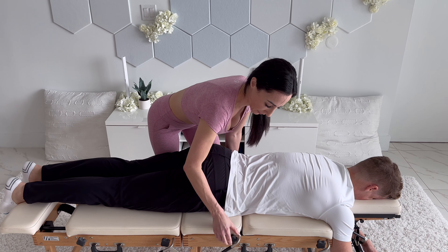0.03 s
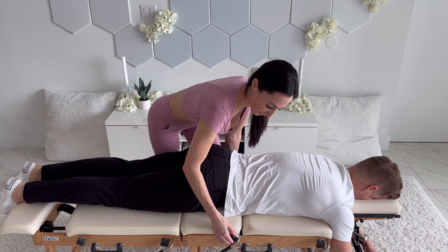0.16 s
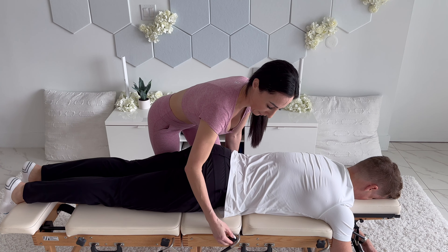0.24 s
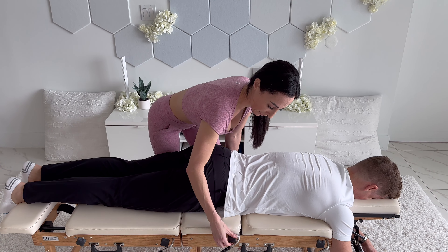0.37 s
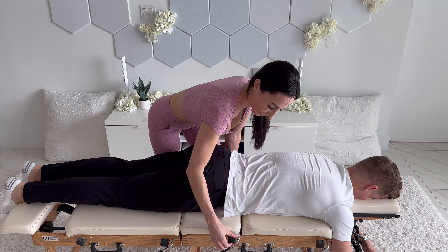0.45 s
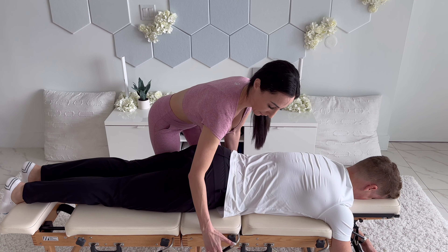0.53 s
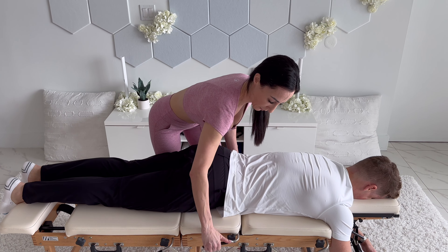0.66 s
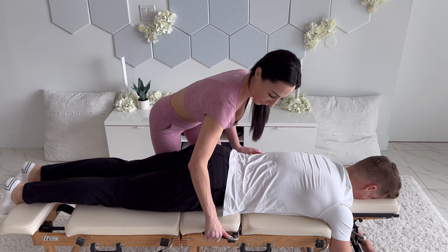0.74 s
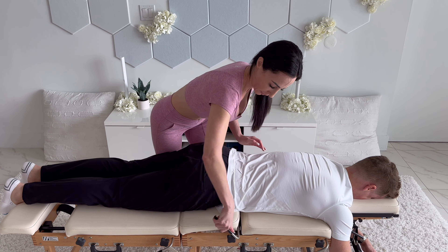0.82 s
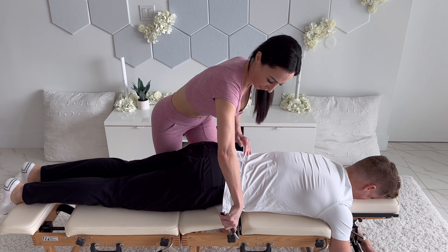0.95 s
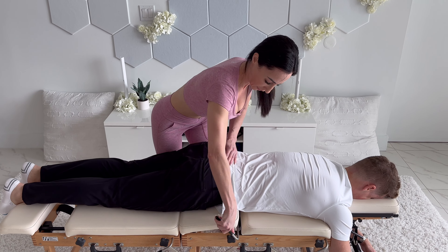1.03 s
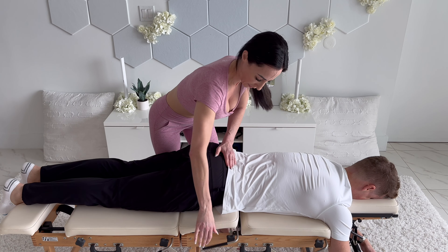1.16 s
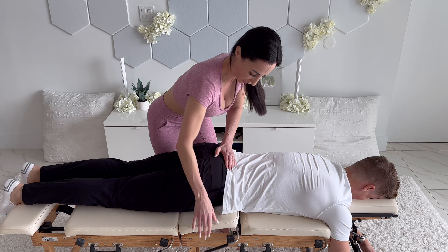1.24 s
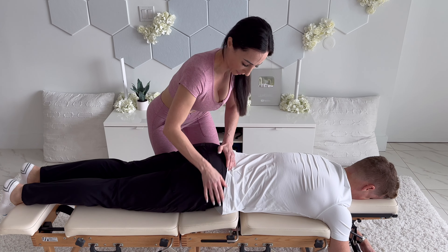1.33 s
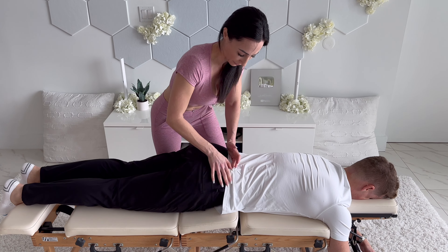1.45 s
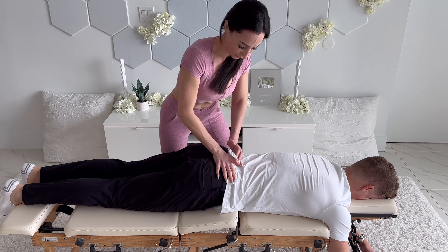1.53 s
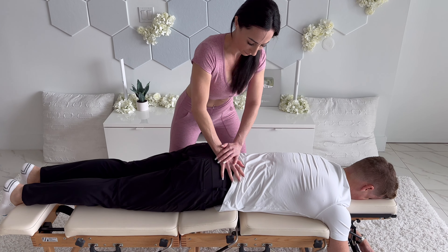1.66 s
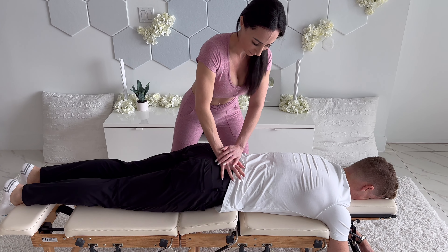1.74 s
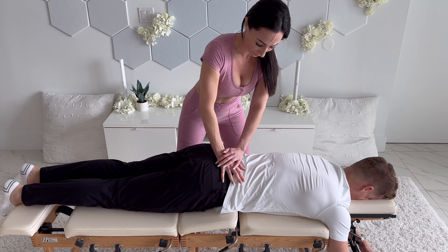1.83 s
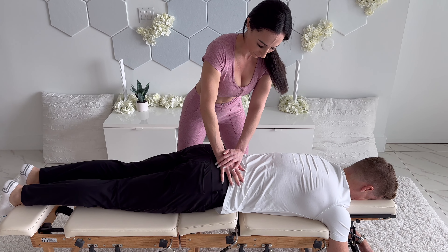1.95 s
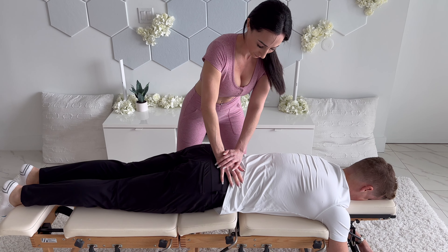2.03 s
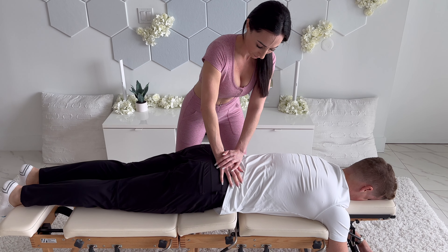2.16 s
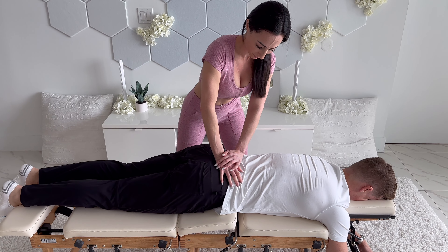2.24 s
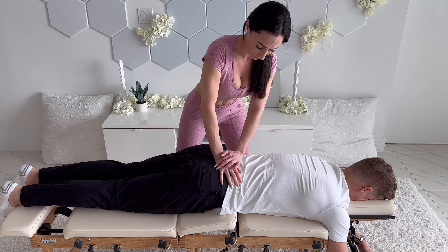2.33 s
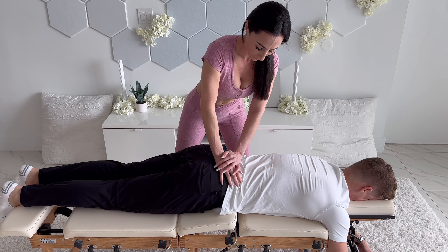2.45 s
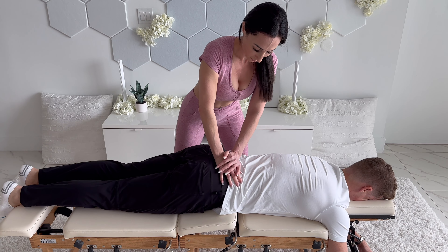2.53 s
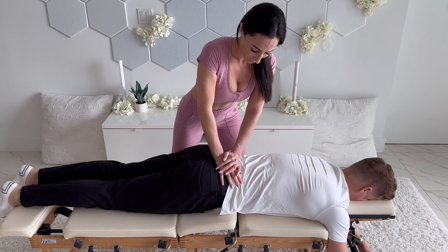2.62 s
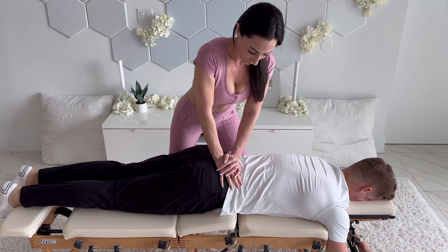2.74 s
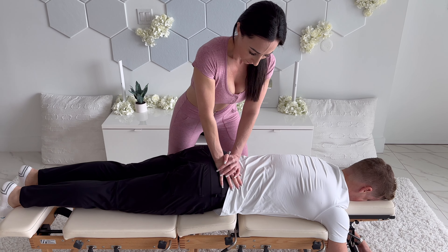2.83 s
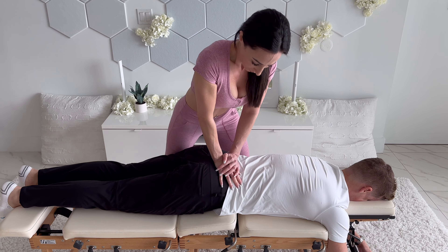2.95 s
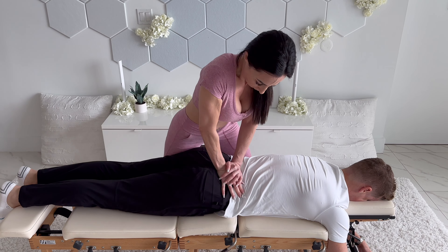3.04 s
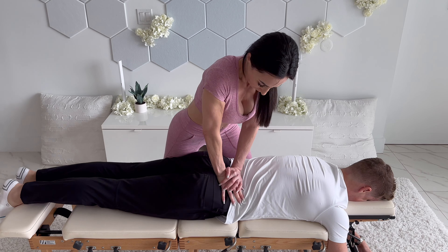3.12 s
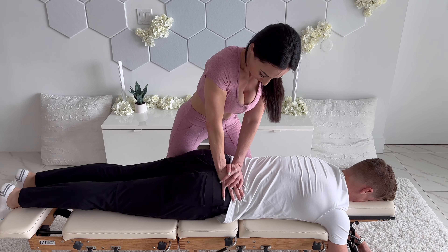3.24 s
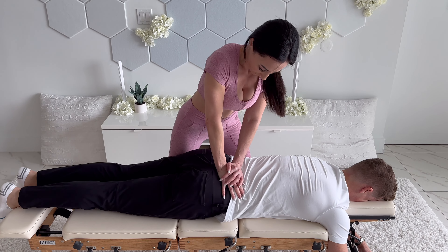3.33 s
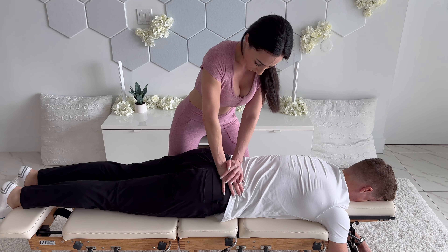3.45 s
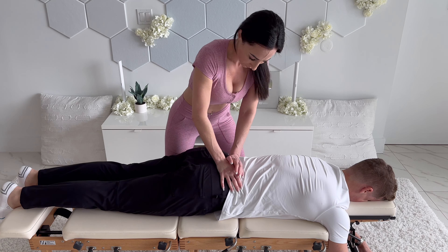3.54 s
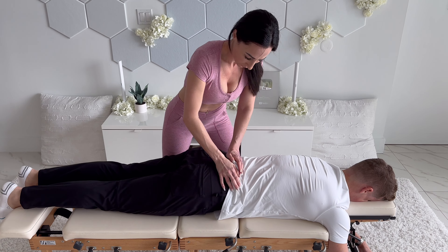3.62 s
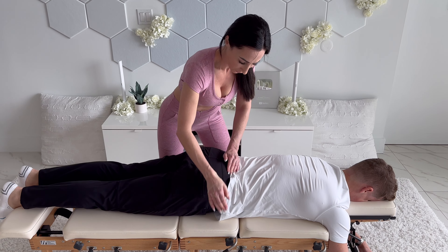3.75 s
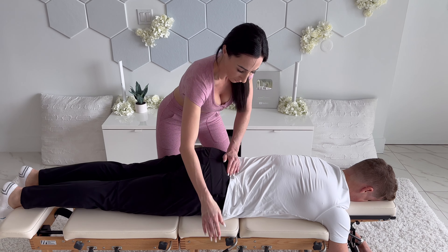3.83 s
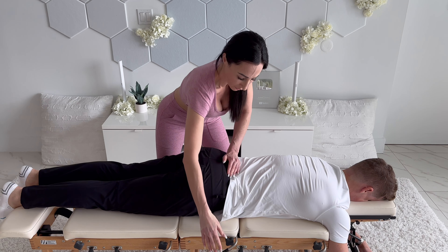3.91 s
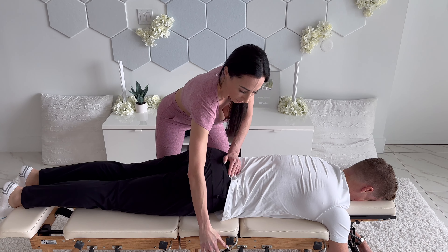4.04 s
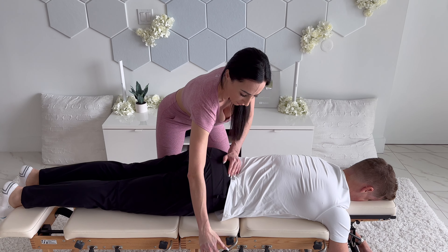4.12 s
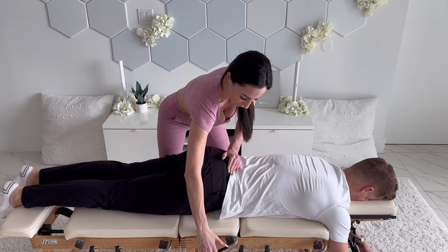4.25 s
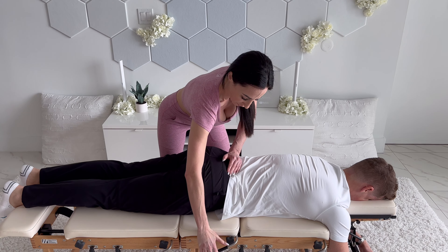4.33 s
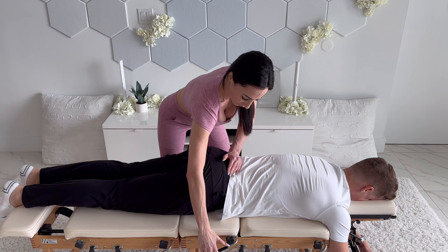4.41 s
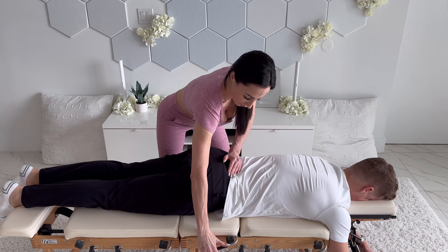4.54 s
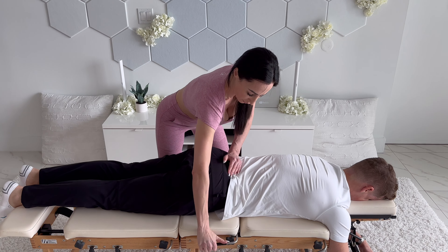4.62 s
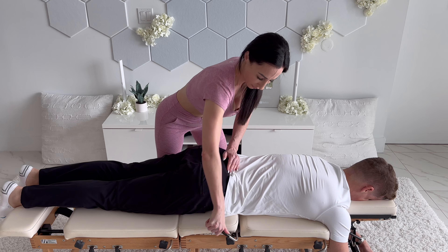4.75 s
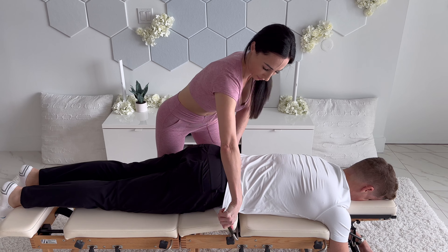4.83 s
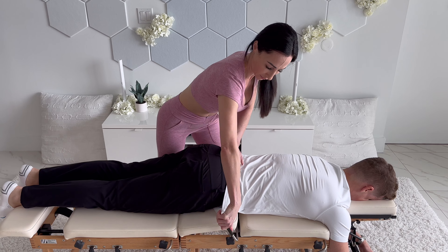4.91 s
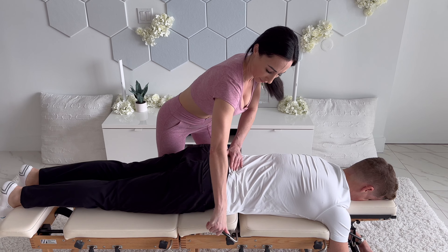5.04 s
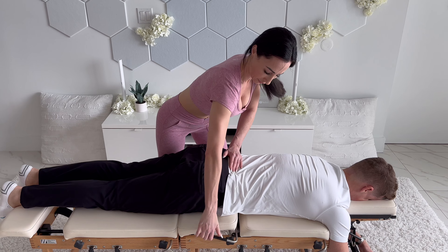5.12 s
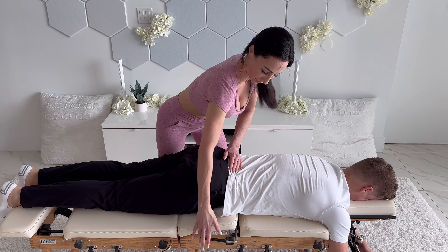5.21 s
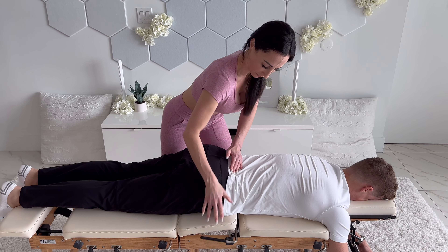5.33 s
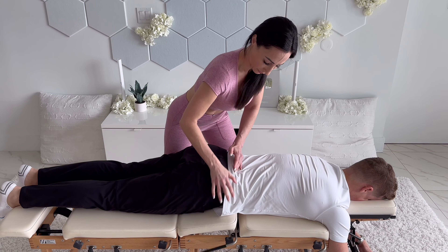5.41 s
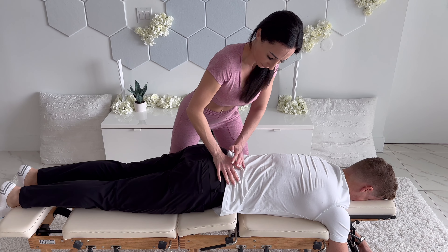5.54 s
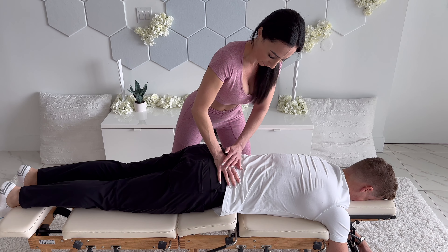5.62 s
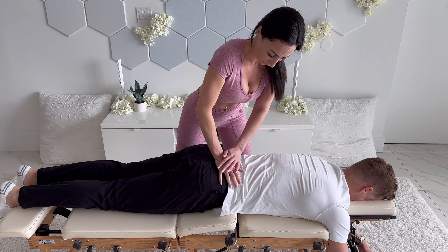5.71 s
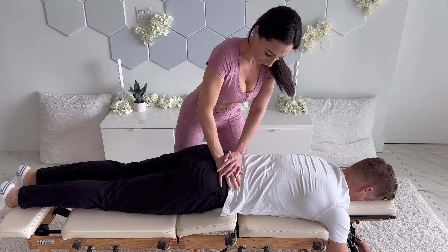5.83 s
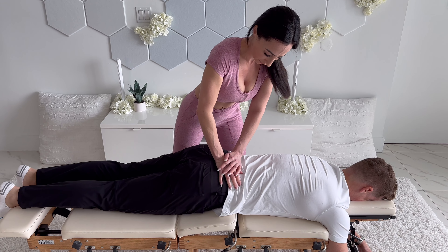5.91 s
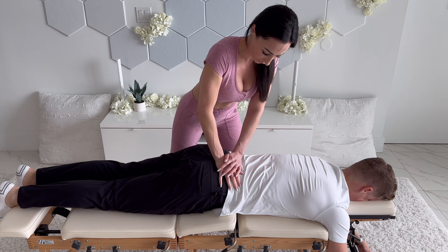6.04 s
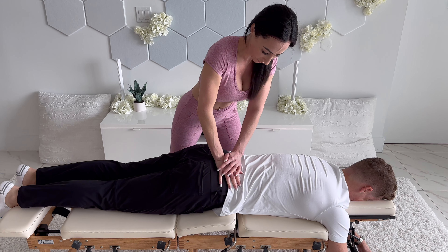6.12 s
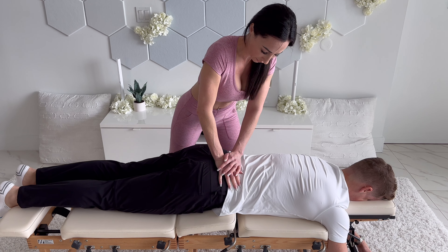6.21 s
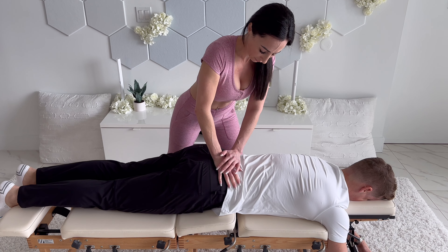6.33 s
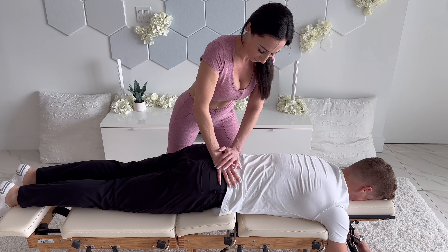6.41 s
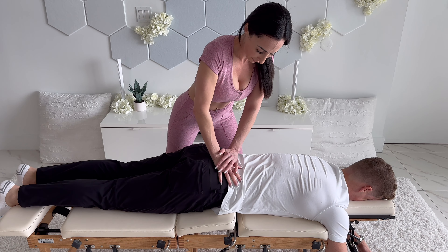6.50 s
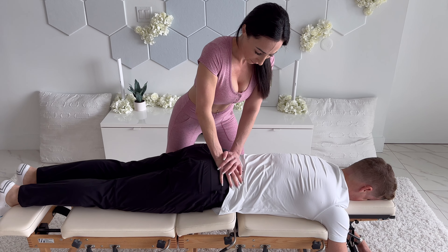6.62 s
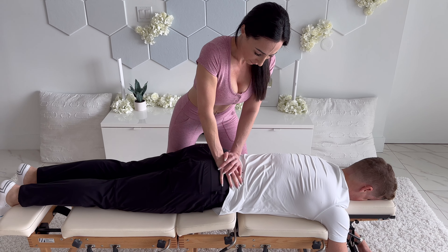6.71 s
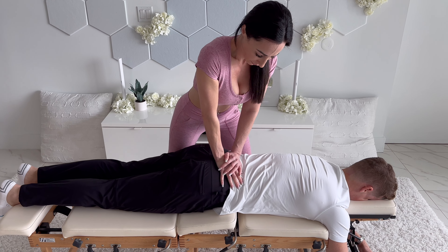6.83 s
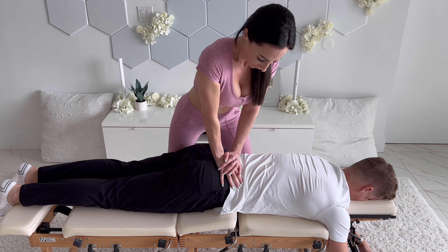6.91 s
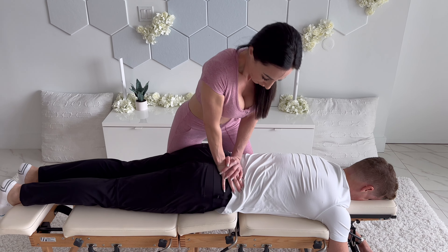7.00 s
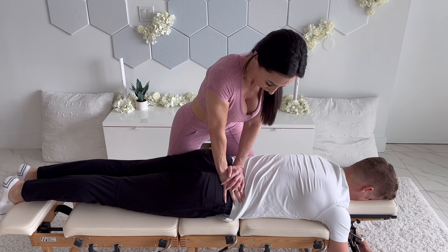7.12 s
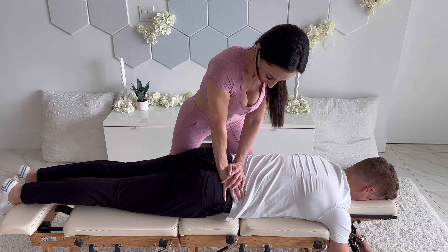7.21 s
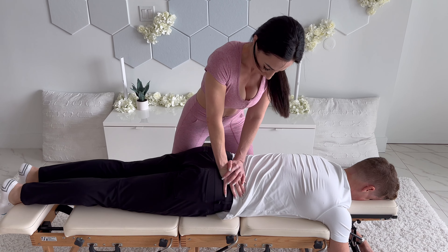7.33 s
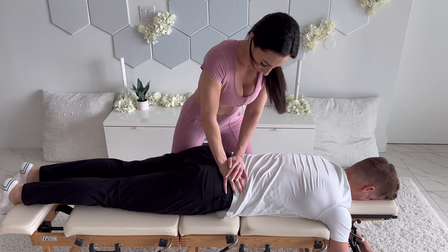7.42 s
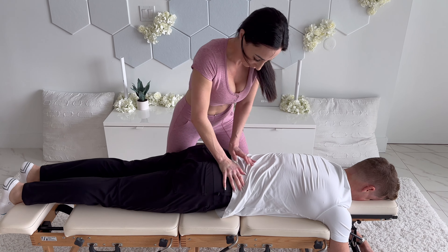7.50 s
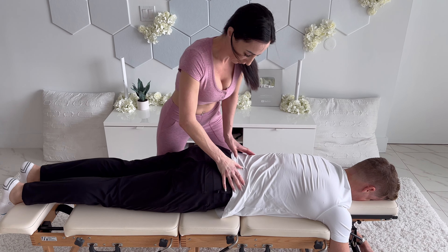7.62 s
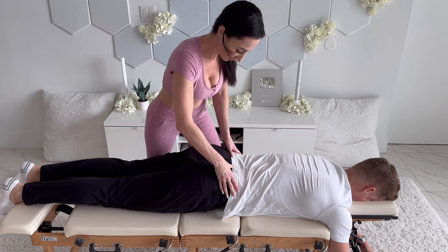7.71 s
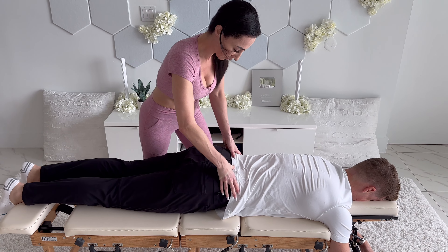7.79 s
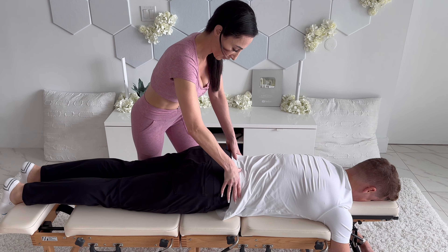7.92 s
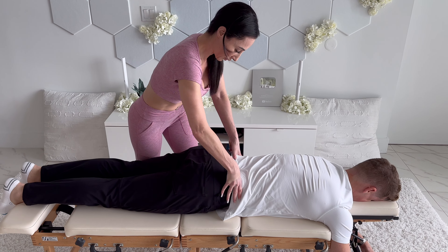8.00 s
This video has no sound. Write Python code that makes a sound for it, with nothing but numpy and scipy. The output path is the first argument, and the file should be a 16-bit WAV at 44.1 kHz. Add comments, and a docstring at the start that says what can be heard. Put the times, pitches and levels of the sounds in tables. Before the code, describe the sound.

A bare room with faint low ventilation, heard closely in mono. At 0 s the reverberant tail of an earlier slam is dying away, with tiny ticks. Around 0.6 s a hand takes the lever with a click and knock; at 0.9 s the latch snaps, steel over wood, and light knocks follow. From 1.2 s the released lever bounces, each knock closer and softer, with thin high pings, until about 2 s. At 3.0 s cloth rustles and the catch gives; at 3.07 s the loaded section slams onto the wooden frame, loud and distorted, with quick rebounds and a ringing tail. Linkage rattles at 3.6 s. A soft knock comes at 4.2 s, rustling at 4.5 s, another snap at 4.8 s, and duller bounces from 5.5 to 6 s. Stronger rustle leads to a second slam at 7.07 s, then rattling near 7.6 s and fading reverberation.

```python
"""Drop table in a treatment room

In a bare room, a lever twice cocks the padded section of a chiropractic table: the latch snaps, and the
lever is let go and bounces to rest. Then a thrust makes the section slam onto the wooden frame. The tail of
an earlier slam opens the scene. Blows are short bursts that ring decaying sines and a noise-made room;
shaped noise makes the rustling clothes and the low ventilation rumble. The slams overload the microphone."""
import sys
import numpy as np
from scipy import signal
from scipy.fft import rfft, irfft, next_fast_len
from scipy.io import wavfile

SR = 44100
rng = np.random.default_rng(int(sys.argv[2]) if len(sys.argv) > 2 else 0)


def put_to_file(sound):
    """Save the sound as 16-bit audio at rate SR, in the file named by the first command-line argument."""
    columns = np.atleast_2d(sound).T  # one column per channel
    safe = np.clip(columns, -1, 1)
    whole_steps = np.round(safe * 32767)
    wavfile.write(sys.argv[1], SR, whole_steps.astype(np.int16))


N = 355401  # samples in the scene
CLICK_SIZE, TAIL_SIZE = 4096, 55296  # samples in a short click and in a full ringing tail
TAIL_TIMES, TAIL_FREQS = np.arange(TAIL_SIZE) / SR, np.fft.rfftfreq(TAIL_SIZE, 1 / SR)  # s, Hz


def undb(db):
    """Turn decibels into a gain."""
    return 10 ** (np.asarray(db) / 20)


def along(points, hz):
    """Read a curve of (Hz, value) points on a log-frequency axis."""
    point_hz, values = np.transpose(points)
    return np.interp(np.log(np.maximum(hz, 1)), np.log(point_hz), values)


def unit(x):
    """Scale a sound to energy 1."""
    return x / np.sqrt(np.sum(x ** 2))


def add(track, start_s, sound):
    """Mix in a sound; one that began before the scene leaves only its tail."""
    i = int(start_s * SR)
    heard = sound[max(-i, 0):N - i]
    track[max(i, 0):max(i, 0) + len(heard)] += heard


def convolve(x, response):
    """Play x through a response."""
    return signal.fftconvolve(x, response)[:N]


def causal(x, gain):
    """Filter x by a gain per frequency, with the filter's response starting at the attack, never before."""
    # folding the cepstrum onto positive times gives the minimum-phase filter
    cepstrum = irfft(np.log(gain))
    cepstrum[1:len(x) // 2] *= 2
    cepstrum[len(x) // 2 + 1:] = 0
    return irfft(rfft(x) * np.exp(rfft(cepstrum)))


def noise(colour):
    """Make steady noise of rms 1 with a given spectrum."""
    size = next_fast_len(N, real=True)
    gain = undb(along(colour, np.fft.rfftfreq(size, 1 / SR)))
    x = irfft(rfft(rng.standard_normal(size)) * gain, size)[:N]
    return x / x.std()


def ring(modes):
    """Each mode of a struck body is a sine that dies away by 60 dB in its own time."""
    tones = []
    for pitch_hz, level_db, t60_s in modes:
        decay = np.exp(-np.log(1000) * TAIL_TIMES / t60_s)
        tones.append(undb(level_db) * np.sin(2 * np.pi * pitch_hz * TAIL_TIMES) * decay)
    return np.array(tones)


def ripple(depth_db, width_hz, from_hz):
    """Countless weak resonances make the response uneven, fully so above from_hz."""
    knots = np.arange(0, SR / 2, width_hz)
    uneven = np.interp(TAIL_FREQS, knots, rng.standard_normal(len(knots)))
    return depth_db * np.minimum(TAIL_FREQS / from_hz, 1) ** 2 * uneven


# How long the room rings: pitch_hz, t60_s (time to fall by 60 dB)
ROOM = [(60, 1.0), (250, .95), (600, .86), (1500, .88), (2700, .75), (4000, .63), (5500, .57), (8000, .48),
        (11000, .38), (16000, .31)]


def diffuse_field():
    """Noise split into the overlapping bands of the room, and the fading gain of each band."""
    centres_hz, t60_s = np.transpose(ROOM)
    size = 4 * TAIL_SIZE
    hz = np.fft.rfftfreq(size, 1 / SR)
    shares = np.array([along(np.column_stack([centres_hz, pick]), hz) for pick in np.eye(len(ROOM))])
    bands = irfft(rfft(rng.standard_normal(size)) * shares)
    return bands, np.exp(-np.log(1000) * TAIL_TIMES / t60_s[:, None])


def room(field, build_s, grain):
    """Separate early reflections thicken into a tail that arrives in bunches and loses its treble first."""
    bands, decays = field
    start = rng.integers(bands.shape[1] - TAIL_SIZE)
    tail = np.einsum("bt,bt->t", bands[:, start:start + TAIL_SIZE], decays)
    spread = grain * np.exp(-TAIL_TIMES / 0.031)
    early = np.exp(spread * rng.standard_normal(TAIL_SIZE) - spread ** 2)
    knots = TAIL_TIMES[::500]
    bunches = np.interp(TAIL_TIMES, knots, undb(2.2 * rng.standard_normal(len(knots))))
    return unit(tail * early * bunches * (1 - np.exp(-TAIL_TIMES / build_s)))


# Colour of the ventilation: pitch_hz, level_db
AIR = [(12, -19.5), (24, -0.5), (38, -19), (58, -14), (75, -24.5), (120, -24.5), (170, -34), (330, -40),
       (800, -48.5), (2000, -57), (4000, -61.5), (14000, -65), (16000, -66)]


def ventilation():
    """Moving air makes a steady noise, strongest in the lowest bass."""
    return undb(-41.5) * noise(AIR)


# Colour of the cloth: pitch_hz, level_db
CLOTH = [(40, -10.5), (200, 4.5), (400, -9), (1000, -15), (2500, -28), (4500, -33), (9000, -42.5),
         (16000, -42)]
# Clothes and upholstery shifting under the hands: start_s, hold_s, level_db
SHIFTS = [(2.39, 0.13, -60.5), (3.0, 0.61, -42.5), (4.021, 0.093, -54.5), (4.525, 0.43, -47),
          (6.432, 0.13, -60), (6.983, 0.41, -37.5)]
SHIFT_ATTACK_S, SHIFT_RELEASE_S, CLOTH_REST_DB = .06, 0.13, -67.5


def rustle():
    """Cloth slides in small uneven slips; each shift starts quickly, holds and dies away."""
    t = np.arange(N) / SR
    slips = np.interp(t, np.linspace(0, N / SR, 200), rng.standard_normal(200))
    motion = np.zeros(N)
    for start_s, hold_s, level_db in SHIFTS:
        attack = np.clip((t - start_s) / SHIFT_ATTACK_S, 0, 1)
        release = np.exp(-np.maximum(t - start_s - hold_s, 0) / SHIFT_RELEASE_S)
        motion += undb(level_db) * attack * release
    return noise(CLOTH) * (undb(CLOTH_REST_DB) + motion) * undb(0.9 * slips)


# Colour of the rattling linkage: pitch_hz, level_db
RATTLE = [(100, -33), (400, -6), (800, 8), (1200, 1.5), (1750, -3.5), (2600, -16), (3500, -25), (7000, -35),
          (16000, -31)]
# The linkage rattling as the pressure comes off: middle_s, half_length_s, level_db
SETTLING = [(3.64, 0.081, -4), (7.59, 0.17, -5)]


def settling(field):
    """After a slam the unloaded springs and linkage chatter in a swell of tiny contacts."""
    t, contacts = np.arange(N) / SR, np.zeros(N)
    for middle_s, half_length_s, level_db in SETTLING:
        # about 110 random contacts a second
        sparse = (rng.random(N) < 110 / SR) * rng.standard_normal(N)
        swell = np.exp(-np.minimum(((t - middle_s) / half_length_s) ** 2, 20))
        contacts += sparse * undb(level_db) * swell
    response = .5 * signal.unit_impulse(TAIL_SIZE) + room(field, build_s=0.0012, grain=0.33)
    return convolve(contacts, causal(response, undb(along(RATTLE, TAIL_FREQS))))


# The lever let go: start_s, level_db, first_flight_s, kept (share of speed per bounce), ping_db
LEVER_FALLS = [(1.232, -1, .252, .738, -1.5), (5.467, -2, .212, .655, -8.5)]
REST_FLIGHT_S = .12  # a flight shorter than this is the last


def bounces():
    """Speed and flight time shrink by the same share at each bounce: start_s, level_db, speed_db, ping_db."""
    rows = []
    for start_s, level_db, first_flight_s, kept, ping_db in LEVER_FALLS:
        for k in range(6):
            speed = kept ** k
            flight_s = first_flight_s * speed
            rows.append((start_s, level_db, 20 * np.log10(speed), ping_db))
            if flight_s < REST_FLIGHT_S:
                break
            start_s = start_s + flight_s
    return rows


# Ringing of the steel handle: pitch_hz, level_db, t60_s
HANDLE = [(3240, -6.5, 0.45), (5200, -0.5, 0.07), (6700, 12, 0.043), (6620, -3, 0.19), (8560, -14, .04),
          (9500, -15, .1)]
# Small ticks of the linkage: start_s, level_db, centre_hz, handle_ring_db (relative to the tick)
TICKS = [(0.072, -24.5, 10000, -12), (0.155, -24, 8050, -5), (0.6004, -9.5, 8800, -3),
         (0.656, -21.5, 9100, 2), (3.6453, -19, 11870, -31), (3.814, -30, 5600, -6),
         (4.695, -37, 4960, -16), (5.177, -33, 4900, -18)]
# The handle chimes after each bounce, and fades faster than the lever's speed
CHIME_DELAY_S, CHIME_DB, CHIME_DB_PER_DB, CHIME_HZ, CHIME_RING_DB = .028, -45.5, 2.04, 7000, 29


def ticks(field):
    """Short, nearly dry clicks set the handle ringing by different amounts."""
    track, handle = np.zeros(N), unit(ring(HANDLE).sum(axis=0))
    t, hz = np.arange(CLICK_SIZE) / SR, np.fft.rfftfreq(CLICK_SIZE, 1 / SR) + 1
    chimes = [(start_s + CHIME_DELAY_S, CHIME_DB + CHIME_DB_PER_DB * speed_db, CHIME_HZ, CHIME_RING_DB)
              for start_s, _, speed_db, _ in bounces()]
    for start_s, level_db, centre_hz, ring_db in TICKS + chimes:
        click = rng.standard_normal(CLICK_SIZE) * np.exp(-t / .001)
        hump = 1 / (1 + 2 * (hz / centre_hz - centre_hz / hz) ** 2)
        add(track, start_s, undb(level_db) * unit(causal(click, hump)))
        add(track, start_s, undb(level_db + ring_db) * handle)
    return track + undb(-12.5) * convolve(track, room(field, build_s=0.0034, grain=.7))


# Colour of the return spring: pitch_hz, level_db
SPRING = [(3000, -35), (8500, -20), (10200, -1.5), (10600, -5.5), (11400, -1), (12200, -8), (13000, -18),
          (14700, -5), (16000, -21)]
PING_DELAY_S, PING_DB_PER_DB = .0145, 3.1  # pings fade much faster than the lever's speed


def pings(field):
    """After each bounce the spring gives a thin, very high snap that lingers in the room."""
    track = np.zeros(N)
    for start_s, _, speed_db, ping_db in bounces():
        snap = unit(rng.standard_normal(TAIL_SIZE) * np.exp(-np.minimum(TAIL_TIMES / .0015, 50)))
        in_room = snap + undb(-7.5) * room(field, build_s=.003, grain=.6)
        ping = causal(in_room, undb(along(SPRING, TAIL_FREQS)))
        add(track, start_s + PING_DELAY_S, undb(ping_db + PING_DB_PER_DB * speed_db) * ping)
    return track


# Brief ringing of the metal stop plate: pitch_hz, level_db, t60_s
PLATE = [(1767, -11, 0.026), (2740, -4, 0.013), (3950, 3, 0.0089), (4700, -7, 0.01), (6320, 8.5, 0.011),
         (6790, -2, 0.023), (7830, -3, .02), (8550, 4, 0.01), (13200, -3, .015)]


def blows(table, colour, body, field, chatter_s, push_db, chatter_db, plate_db, ring_db, room_db,
          build_s, grain, thud_hz):
    """A push, a chatter of loose parts and a crack of the stop plate ring the body and fill the room."""
    track, modes = np.zeros(N), ring(body)
    # the plate scrapes into contact over a few milliseconds, so its ringing builds up
    plate = ring(PLATE).sum(axis=0) * (1 - np.exp(-TAIL_TIMES / .002))
    crack = undb(push_db) * signal.unit_impulse(TAIL_SIZE) + undb(plate_db) * unit(plate)
    colour_db = along(colour, TAIL_FREQS) + ripple(depth_db=1.8, width_hz=32, from_hz=500)
    low = 1 / (1 + (TAIL_FREQS / thud_hz) ** 4)
    swell = (TAIL_TIMES * np.exp(-TAIL_TIMES / chatter_s))[:CLICK_SIZE]
    for start_s, level_db, thud_db, bright_hz in table:
        sound = crack + undb(room_db) * room(field, build_s, grain)
        sound[:CLICK_SIZE] += undb(chatter_db) * unit(rng.standard_normal(CLICK_SIZE) * swell)
        # the place of the blow decides which way each mode starts
        signs = rng.choice([-1., 1.], len(modes))
        sound += undb(ring_db) * unit(np.einsum("m,mt->t", signs, modes))
        # thud_db sets the bass; a softer contact has less treble
        softness = np.sqrt(1 + (TAIL_FREQS / bright_hz) ** 3)
        gain = undb(level_db + colour_db + thud_db * low) / softness
        add(track, start_s, causal(sound, gain))
    return track


def contact(start_s, force_db, kind):
    """A blow of a given kind, made louder by the force behind it."""
    level_db, thud_db, bright_hz = kind
    return start_s, force_db + level_db, thud_db, bright_hz


# Cocking the section: lift_s (the pawl lifts), snap_s (it snaps in), force_db
COCKINGS = [(0.875, 0.892, 0), (4.809, 4.827, 1)]


def cocking(lift, snap):
    """The two blows of every cocking: the pawl lifts, then snaps in."""
    table = []
    for lift_s, snap_s, force_db in COCKINGS:
        table.append(contact(lift_s, force_db, lift))
        table.append(contact(snap_s, force_db, snap))
    return table


# Colour of a blow on wood: pitch_hz, level_db
WOOD = [(30, -21.5), (80, 7), (122, 13.5), (170, 8), (250, 10), (340, 6.5), (520, 3), (800, 3.5), (1300, 0),
        (1900, -5), (2700, -4), (3100, -10.5), (4800, -15), (5700, -22.5), (6400, -22), (10000, -25.5),
        (16000, -27.5)]
# Ringing of the wooden frame, also used by the drops: pitch_hz, level_db, t60_s
FRAME = [(60, -1, 1), (118, -3, .7), (139.5, 3, .85), (172, 3, .85), (200, -4, .7), (224, 2, .8),
         (245, -1, .7), (345, -2, .7), (404, 1, .7), (457, 0, .7), (488, -1, .7), (553, -2, .8),
         (635, -3, .5), (732, 1, .7), (755, 3, .8), (783, 2, .9), (825, -1, .6), (877, -2, .5),
         (1005, -4, .5), (1162, 4, .8), (1300, 2, .6), (1433, -1, .6), (1535, -1, .6), (1705, -3, .8),
         (1815, 0, .7), (2218, 1, .7), (2356, 0, .6), (2509, 0, .6), (2720, 0, .6)]
# The hand taking and easing the lever, and the frame settling: start_s, level_db, thud_db, bright_hz
KNOCKS = [(0.612, -10.5, 4, 2900), (0.658, -9.5, -7.5, 1330), (1.089, -9, -24, 800),
          (1.130, -10.5, -11, 1190), (1.156, -8.5, -15, 1500), (4.164, -17, -5, 880),
          (5.030, -13, -6.5, 1330), (5.080, -10, -6, 746), (5.120, -11, -14, 1890), (7.529, -14, -15, 1600)]
# Each bounce is a hard touch, a dull knock and a shake:
# delay_s, level_db, slope (dB per dB of speed), thud_db, bright_hz (at full speed)
BOUNCE = [(0, -1, 1.4, -4.5, 5800), (.0072, -2.5, 0.05, -11, 1500), (.032, -9.5, 0.46, -6, 2800)]
BRIGHT_POWER = 0.5  # a slower bounce is a softer contact: brightness follows speed to this power
# Thrusts, also used by the latch and drops: give_s (the catch gives way), land_s, force_db
THRUSTS = [(-.325, -.27, -0.5), (3.01, 3.067, 0), (7.017, 7.068, 0.5)]
# Single contacts on wood: level_db (before the force), thud_db, bright_hz
GIVE_WOOD, HEAVE_WOOD = (-24, 3.4, 1600), (-15.5, 2.7, 280)
LIFT_WOOD, SNAP_WOOD = (-15, 3, 4500), (-5, 0, 650)
HEAVE_LEAD_S = .013  # the pad heaves just before the pawl lifts


def knocks(field):
    """The wooden frame answers the hand, the cocking, the bouncing lever and the catch giving way."""
    bouncing = []
    for start_s, level_db, speed_db, _ in bounces():
        for delay_s, part_db, slope, thud_db, bright_hz in BOUNCE:
            part_level_db = level_db + part_db + slope * speed_db
            part_bright_hz = bright_hz * undb(BRIGHT_POWER * speed_db)
            bouncing.append((start_s + delay_s, part_level_db, thud_db, part_bright_hz))
    giving = [contact(give_s, force_db, GIVE_WOOD) for give_s, _, force_db in THRUSTS]
    heaving = [contact(lift_s - HEAVE_LEAD_S, force_db, HEAVE_WOOD) for lift_s, _, force_db in COCKINGS]
    table = KNOCKS + cocking(LIFT_WOOD, SNAP_WOOD) + bouncing + giving + heaving
    return blows(table, WOOD, FRAME, field, chatter_s=0.0038, push_db=2, chatter_db=21.0, plate_db=19.5,
                 ring_db=11.5, room_db=20.0, build_s=.003, grain=0.5, thud_hz=296)


# Colour of the latch: pitch_hz, level_db
STEEL = [(200, -77.5), (1200, -15), (2300, -10), (3200, -14.5), (5300, -14.5), (6500, -16), (7600, -15),
         (9800, -11.5), (10600, -19.5), (14800, -15.5), (16000, -34)]
# Ringing of the steel latch: pitch_hz, level_db, t60_s
CATCH = [(2509, -2, .35), (2745, -2, .35), (3520, -4, .2), (4048, -5, .3), (4560, -3, .35), (5130, -4, .25),
         (5270, 2, .4), (6400, -3, .3), (7900, -4, .15), (8942, -2, .15), (9750, -2, .15)]
# Single contacts on steel: level_db (before the force), thud_db, bright_hz
LIFT_STEEL, SNAP_STEEL, LOCK_STEEL = (-2.5, 5, 3700), (-1.1, -3, 10000), (3.5, 2, 15000)
LOCK_DELAY_S = .0205  # from landing until the latch snaps home


def latch(field):
    """Hard steel snaps with a bright, hissing tail, on cocking and again on landing."""
    locking = [contact(land_s + LOCK_DELAY_S, force_db, LOCK_STEEL) for _, land_s, force_db in THRUSTS]
    table = cocking(LIFT_STEEL, SNAP_STEEL) + locking
    return blows(table, STEEL, CATCH, field, chatter_s=.001, push_db=11.0, chatter_db=22, plate_db=13.0,
                 ring_db=8.5, room_db=16.5, build_s=.003, grain=0.42, thud_hz=250)


# Colour of the loaded section: pitch_hz, level_db
SECTION = [(25, -13.5), (62, -0.5), (100, -2), (135, 1.5), (175, 2), (240, 4), (340, 3), (500, 2.5),
           (800, 1), (1300, -2.5), (2400, -6.5), (3400, -10.5), (6500, -15), (10000, -19), (16000, -21.5)]
# Each landing is a first touch, the full weight, the stop and two rebounds:
# delay_s, level_db (before the force), thud_db, bright_hz
LANDING = [(0, -2.5, 14.5, 4044), (.0075, 11, 12.5, 4320), (.021, 9, 4, 4416), (.073, 4.5, 9.5, 3450),
           (.118, 0.5, -0.5, 1535)]


def drops(field):
    """The section falls with the weight of a body on it and slams onto the ringing frame."""
    landings = [contact(land_s + delay_s, force_db, kind)
                for _, land_s, force_db in THRUSTS for delay_s, *kind in LANDING]
    return blows(landings, SECTION, FRAME, field, chatter_s=0.0038, push_db=19.0, chatter_db=20.5,
                 plate_db=12.5, ring_db=13, room_db=23.0, build_s=0.004, grain=1.0, thud_hz=266)


def scene():
    """Mix the ventilation, the clothes and the table into one channel."""
    field = diffuse_field()
    background = ventilation() + rustle()
    mechanism = settling(field) + ticks(field) + pings(field) + knocks(field) + latch(field)
    return (background + mechanism + drops(field))[None]


def record(dry):
    """The microphone flattens the slams, blocks the lowest bass and cuts the top."""
    ceiling, knee = .8, 7  # a higher knee bends more sharply into the ceiling
    clipped = dry / (1 + np.abs(dry / ceiling) ** knee) ** (1 / knee)
    no_bass = signal.sosfilt(signal.butter(1, 8, "high", fs=SR, output="sos"), clipped)
    return signal.sosfilt(signal.ellip(8, .2, 70, 16000, fs=SR, output="sos"), no_bass)


dry = scene()
out = record(dry)
put_to_file(out)
```